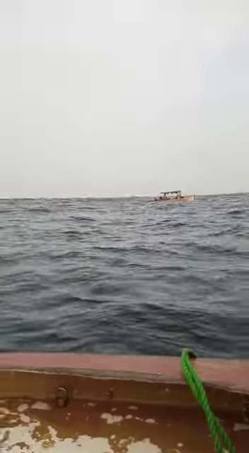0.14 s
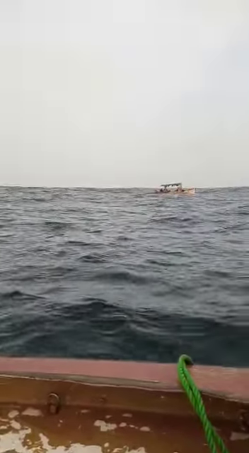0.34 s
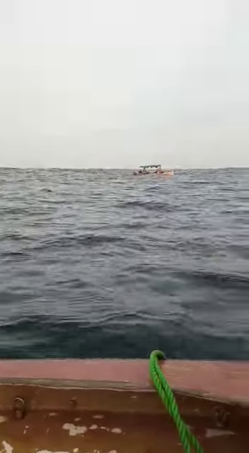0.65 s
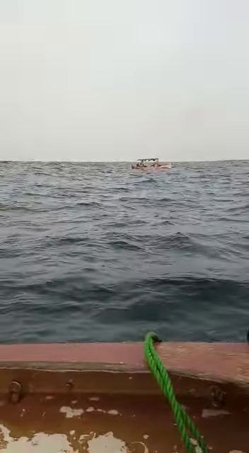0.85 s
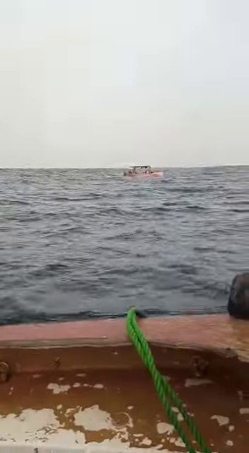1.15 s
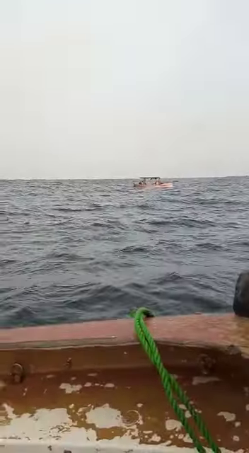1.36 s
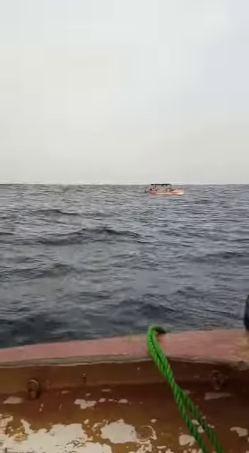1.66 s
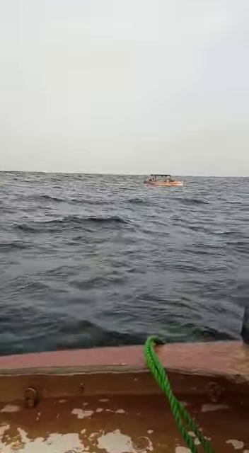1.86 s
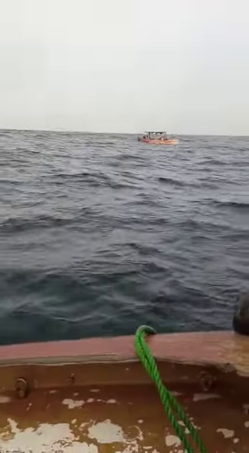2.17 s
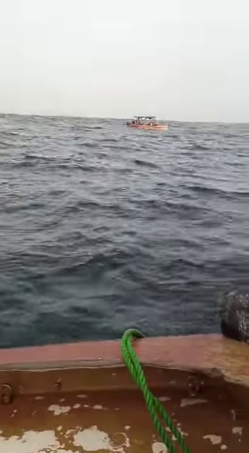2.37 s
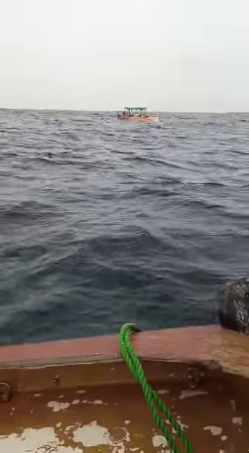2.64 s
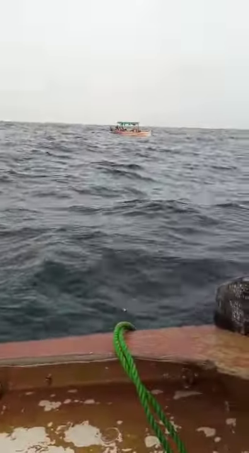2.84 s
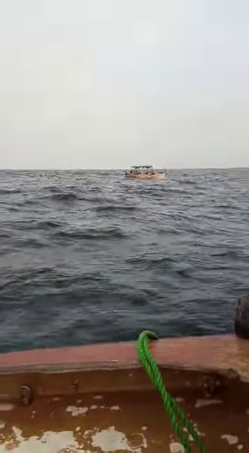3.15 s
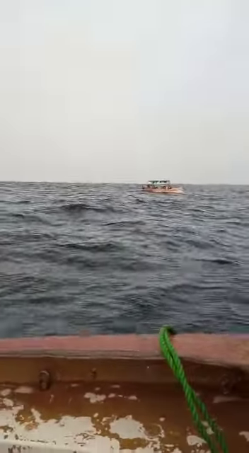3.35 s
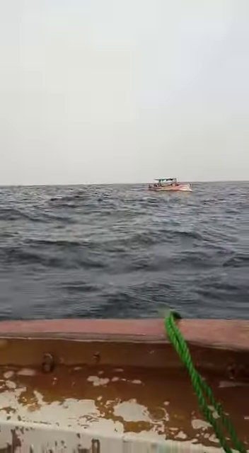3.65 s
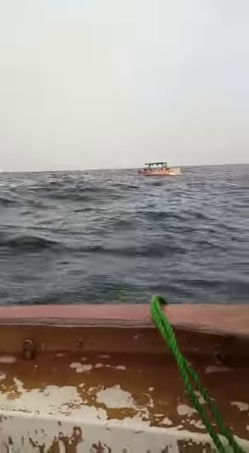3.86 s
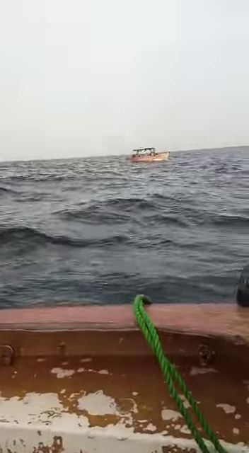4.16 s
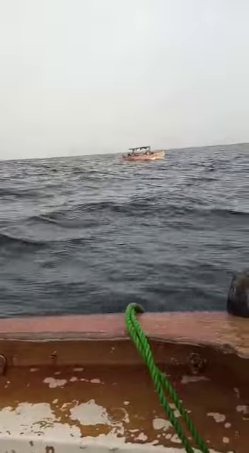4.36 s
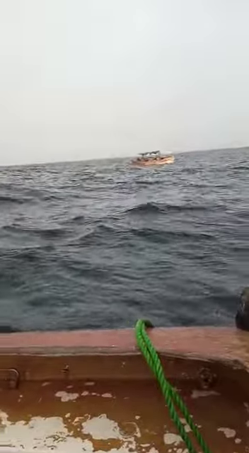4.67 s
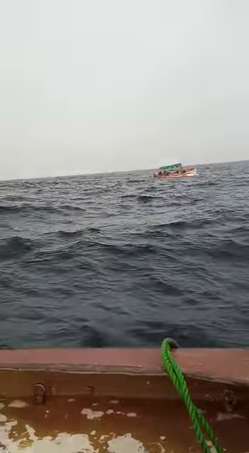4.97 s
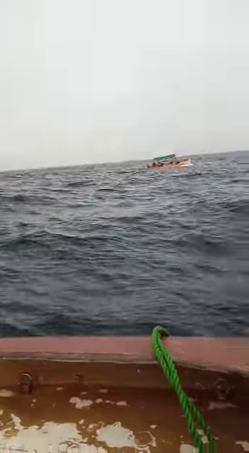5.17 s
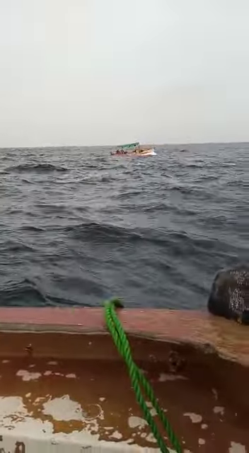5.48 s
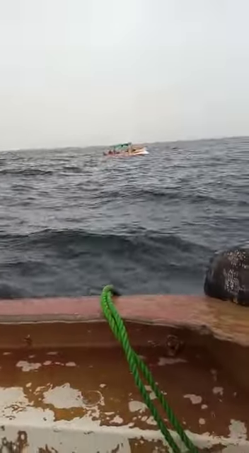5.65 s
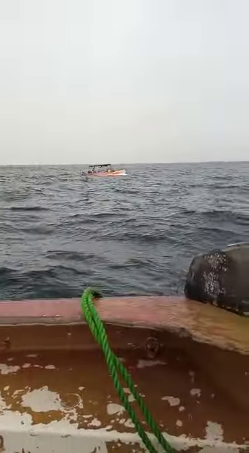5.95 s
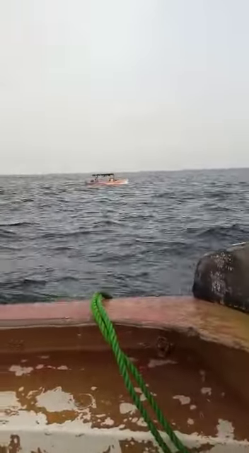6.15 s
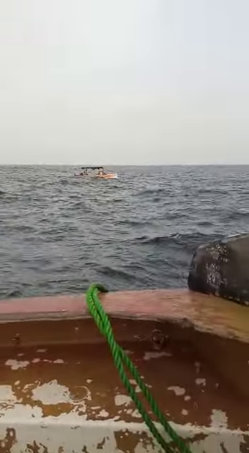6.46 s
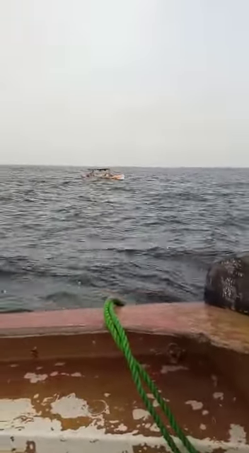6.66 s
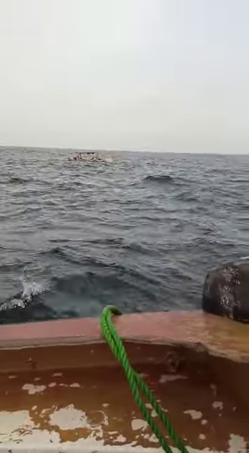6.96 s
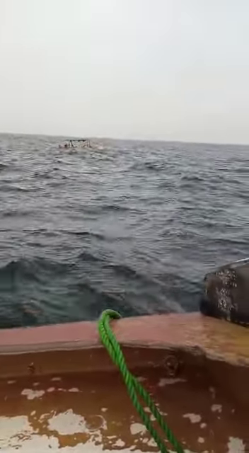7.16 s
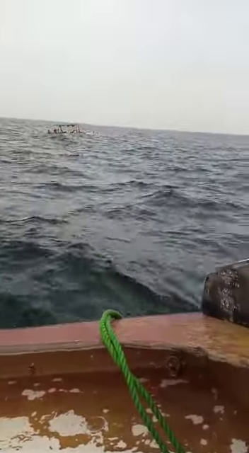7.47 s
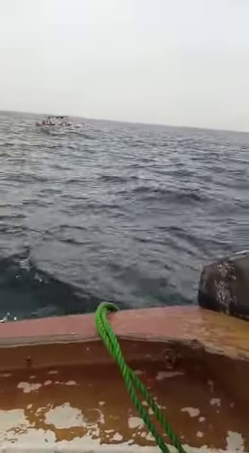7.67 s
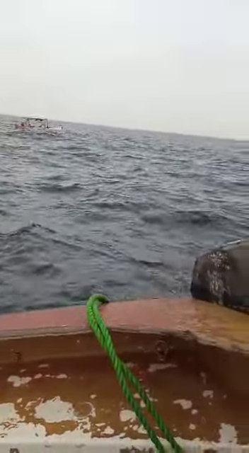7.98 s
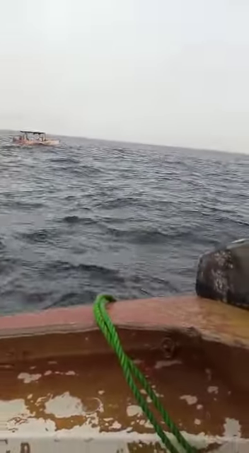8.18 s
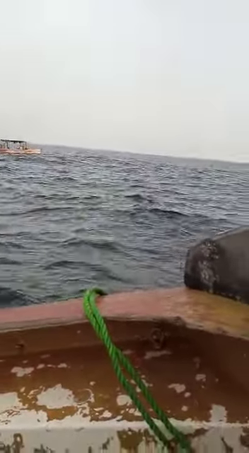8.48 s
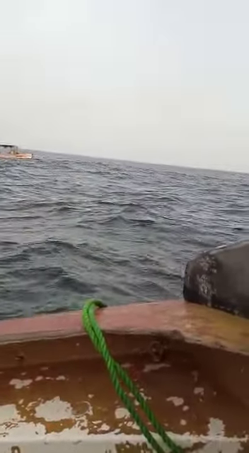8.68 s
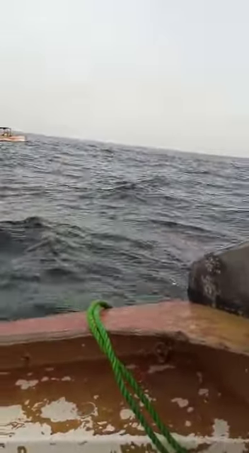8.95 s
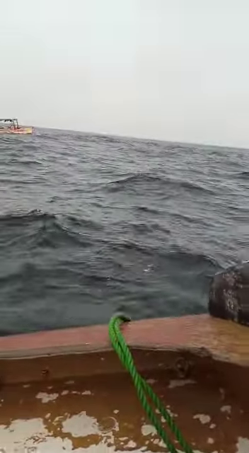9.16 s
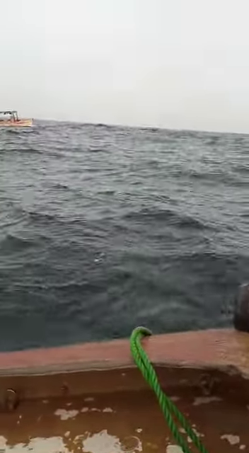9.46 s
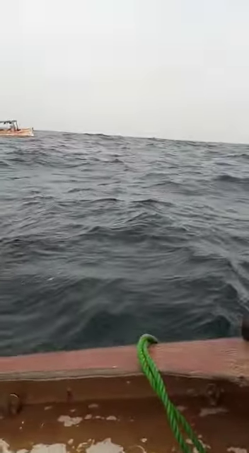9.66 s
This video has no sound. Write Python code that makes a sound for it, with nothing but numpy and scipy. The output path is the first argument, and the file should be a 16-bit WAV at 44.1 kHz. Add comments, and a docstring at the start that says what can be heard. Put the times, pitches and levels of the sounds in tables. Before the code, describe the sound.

Steady diesel chugging on a wooden boat, with washing water, gusts of wind on the microphone and faint creaking later on.

```python
"""A diesel thuds at a nearly even speed, heard from the deck of a wooden boat on the open sea.
Each cycle its blows ring the exhaust, block and valve gear, gas hisses once and loose panels buzz.
Water washes along the hull, wind buffets the microphone and a small part ticks at its own pace.
Later the wind drops, and something under strain sticks and slips, creaking as the boat rolls."""
import sys
import numpy as np
from scipy import signal
from scipy.fft import rfft, irfft, next_fast_len
from scipy.io import wavfile
from scipy.ndimage import uniform_filter1d, minimum_filter1d

SR = 44100
rng = np.random.default_rng(int(sys.argv[2]) if len(sys.argv) > 2 else 0)


def to_wav(s):
    """Save 16-bit WAV."""
    ch = np.atleast_2d(s).T  # columns
    pcm = np.round(np.clip(ch, -1, 1) * 32767)  # PCM
    wavfile.write(sys.argv[1], SR, pcm.astype(np.int16))


N = 433062
T = np.arange(N) / SR
FFT_SIZE = next_fast_len(N + 8192)
LOG_HZ = np.log(np.fft.rfftfreq(FFT_SIZE, 1 / SR) + 1)
CALM_DB = -37  # the wind once it drops

# How each source rises and falls at the microphone. Each row: time in seconds, relative level in dB.
WASH_LEVEL = [(0, -43.5), (0.7, -42), (2.05, -44.5), (2.5, -41.5), (2.84, -38.5), (3.2, -41.5), (3.72, -46),
              (4.2, -42.5), (4.8, -49), (5.36, -44), (5.69, -39.5), (5.93, -41), (6.05, -42.5),
              (6.37, -44.5), (6.97, -40), (7.0, -38.5), (7.14, -37), (7.17, -41.5), (7.55, -38.5),
              (7.68, -39), (7.9, -41.5), (8.04, -42), (8.07, -41), (9.03, -43), (9.82, -42)]
WIND_LEVEL = [(0, -18), (.15, -29), (.4, -21), (.62, -29.5), (.73, -24), (.85, -25.5), (1.2, -31),
              (1.47, -22), (1.68, -27), (1.82, -21), (1.91, -35), (2.02, -15.5), (2.12, -29), (2.27, -18.5),
              (2.45, -39), (3.1, -23), (3.4, -39), (3.68, -28), (3.82, -19.5), (4.05, -28.5), (4.22, -26.5),
              (4.35, -20), (4.6, -16.5), (4.72, -21), (4.88, -24), (4.94, -17), (5.05, -23.5),
              (5.25, -12.5), (5.45, -18), (5.55, -25.5), (5.7, -20.5), (5.82, -35), (5.92, -14),
              (6.02, -26), (6.2, -24), (6.6, CALM_DB), (9.82, CALM_DB)]
DEEP_WIND_LEVEL = [(0, -31.5), (3.6, -34.5), (4, -37), (4.7, -31), (5.5, -36), (5.9, -43), (6.3, -36),
                   (7, -34), (7.4, -42), (9.82, -39)]
TICK_LEVEL = [(0, -53), (.55, -48), (1.8, -58), (2.5, -53), (2.7, -57), (3.65, -54), (3.9, -62), (4.3, -77),
              (4.9, -45.5), (5.25, -55), (5.55, -47.5), (7, -69), (8.5, -76), (9.3, -55), (9.5, -51.5),
              (9.82, -46)]
PUFF_LEVEL = [(0, -57.5), (3.5, -58), (4.9, -60), (6, -57.5), (9.82, -57.5)]
# Colour of each noise, heard on deck. Each row: frequency in Hz, gain in dB.
WASH_TONE = [(710, -6.5), (1200, 0), (1290, -5), (1470, -6), (1750, -8.5), (2150, -11.5), (2940, -11),
             (3170, -10.5), (4880, -13), (6450, -11), (7920, -23), (9020, -20.5), (13400, -41),
             (15100, -25), (15800, -46)]
WIND_TONE = [(20, -52), (40, -17), (80, 4.5), (150, 3), (300, -3.5), (600, -20), (1200, -53), (2500, -95),
             (7000, -101)]
DEEP_WIND_TONE = [(20, -19), (40, -1), (60, 13.5), (85, 5), (130, -39), (400, -95)]
FLAPPING_TONE = [(200, -15), (450, 3), (800, -6), (1500, -24.5), (3000, -44), (8000, -96)]
WIND_CRACK_TONE = [(300, 6), (900, 26), (2000, 8), (4000, -4.5), (8000, -23), (10000, -40)]
TICKING_TONE = [(1500, 7), (2800, 3), (3700, 16), (4600, 14), (6000, 15), (7500, 4), (9000, 9), (12000, -2),
                (13500, -21), (15200, 4)]
GAS_TONE = [(7000, -30), (8500, -1), (10500, -3), (12000, -8), (13400, -11), (14500, 0), (15700, 0)]
ENGINE_BLUR_TONE = [(40, -27), (90, -1), (130, 2), (200, -9.5), (250, -16.5), (285, -2.5), (350, -12),
                    (440, -7.5), (492, -7), (540, -10.5), (620, -16.5), (900, -20), (1300, -22),
                    (1600, -31), (2200, -31.5), (3500, -45), (7000, -97)]
# Buffets right on the microphone. Each row: start in seconds, strength in dB, treble against bass in dB.
BUFFETS = [(.725, -33, -32), (0.891, -33, -28), (1.846, -19, -36), (2.022, -37, -30), (2.25, -30, -35),
           (2.289, -33, -33), (3.817, -22.5, -32), (4.487, -20.5, -21), (4.589, -22, -19),
           (4.619, -23.5, -17), (4.69, -24, -20), (4.756, -24, -14), (4.812, -17, -6), (4.951, -24, -27),
           (4.975, -14, -16.5), (5.024, -25.5, -7), (5.15, -19.5, -28), (5.229, -24, -31),
           (5.269, -12, -11), (5.355, -21, -8), (5.426, -19.5, -11), (5.526, -22.5, -28),
           (5.772, -18.5, -26), (5.942, -28.5, -37)]
# Cracks on the hardest buffets, clinks under the tick and lone snaps in the creak.
# Each row: start in seconds, strength in dB.
WIND_CRACKS = [(4.507, -33), (4.7577, -25), (4.7634, -30), (4.8155, -20), (4.824, -32), (4.981, -22.5),
               (5.024, -28), (5.2675, -28), (5.273, -20), (5.43, -28)]
TICK_CLINKS = [(0.3641, -44), (1.703, -38), (2.4882, -45), (2.6424, -34), (2.7197, -35), (2.799, -36),
               (2.8784, -35), (2.9552, -41), (3.035, -36), (3.1128, -35), (3.188, -33.5), (3.3473, -34),
               (3.4236, -37), (3.5024, -35.5), (3.6586, -35), (3.739, -36.5)]
LONE_SLIPS = [(6.9307, -38), (7.4171, -43), (7.4859, -46), (7.5278, -46), (7.9084, -39), (8.0395, -41)]
# Runs of creaking. Each row: start and length in seconds, strength in dB, first and last slips a second.
CREAK_RUNS = [(6.28, 0.19, -47, 22, 14), (6.546, 0.23, -43.5, 30, 140), (6.868, 0.28, -44, 60, 140),
              (7.181, 0.24, -43.5, 74, 110), (7.399, 0.14, -46, 70, 51), (7.572, .1, -42.5, 150, 160),
              (7.689, 0.26, -42, 156, 170), (7.955, 0.092, -42.5, 130, 69)]
# Resonances stirred by noise. Each row: frequency in Hz, width in Hz, gain in dB.
CLINK_BANDS = [(3260, 830, 15.3), (3940, 57, 20), (5330, 260, 6.6)]
CREAK_BANDS = [(4730, 130, 7.5), (5900, 760, 7), (6670, 630, 7.5), (8860, 650, 5.5), (10400, 300, -3),
               (11700, 840, -1), (13100, 700, -6), (14700, 600, 5), (15400, 500, 4)]
PANEL_A_BANDS = [(1857, 70, 1.5), (2727, 75, -1.5), (3304, 110, -3.5), (4070, 93, -3.5)]
PANEL_B_BANDS = [(1750, 67, 3.5), (2400, 70, -0.5), (2530, 55, 1), (3140, 36, 1.5), (3780, 47, -5.5),
                 (4290, 46, -2.5)]
COVER_HUM_BANDS = [(878, 6, -27)]
# How well the panels carry to the microphone. Each row: time in seconds, gains of A and B in dB.
PANEL_LEVELS = [(0, -31, -40), (.6, -41.5, -39.5), (2, -36, -44), (2.8, -33.5, -39.5), (3.8, -37, -41),
                (5, -38, -46), (6.5, -41, -40.5), (8, -42, -40), (9, -42, -33.5), (9.82, -44, -39)]
# Crankshaft speed. Each row: time in seconds, turns a minute.
CRANK_RPM = [(0, 1193.0), (0.8, 1171.5), (1.3, 1187.2), (2.8, 1179.4), (3.7, 1153.9), (4.4, 1154.7),
             (6, 1180.2), (7.4, 1187.9), (8.6, 1178.8), (9.4, 1160.8), (9.9, 1158.6)]
# Struck parts of the engine, a dull knock near 255 Hz and a short ringing knock near 520 Hz.
# Each row: frequency in Hz, time to fall 60 dB in seconds, gain in dB, signed weight.
EXHAUST_MODES = [(61.7, 0.31, -43.5, -1), (101.4, 0.2503, -19.4, 1), (114.5, 0.31, -27.2, 1),
                 (175.8, 0.31, -10.0, -1), (208.2, 0.31, -20.3, 1), (240.6, 0.31, -21.0, -1)]
BLOCK_MODES = [(324, .3, -18.3, -1), (351.4, .276, 0, 1), (387.4, .0753, 10.8, 1), (425.9, .0283, 19.1, -1),
               (469.6, .118, 4.3, 1), (545, .12, 1, 1), (660, .0333, 7.5, -1)]
HEAD_MODES = [(721, 0.05, -13.5, -0.76), (947, 0.013, 4.5, 0.46), (992, 0.038, 12.5, -0.15),
              (1219.4, 0.011, 17, -0.8), (1269, 0.0088, 18.5, 0.83), (1421, 0.011, 9.5, -0.53),
              (1696, 0.032, -0.5, -0.23), (2044, 0.012, 4, 0.36)]
TAPPET_MODES = [(1276, 0.051, 13.2, 0.59), (1080, 0.031, 1.9, -0.5)]
COVER_MODES = [(879.5, 0.047, -29.5, 0.71), (1088, 0.042, -34, 0.69), (2030, 0.016, -35, 0.84)]
LOW_KNOCK_MODES = [(255, .03, 0, 1)]
MID_KNOCK_MODES = [(520, .05, 0, 1)]
# Blows that ring those modes in one cycle.
# Each row: crank angle in degrees, strength in dB, brightness in dB per octave.
EXHAUST_BLOWS = [(-23.7, -1.2, -5.6), (111.1, -5.2, 8.9), (208.1, -4.3, -9.1), (352.3, -14.1, 6.0),
                 (443.5, -0.5, -9.5), (574.5, -8.5, 0.5)]
BLOCK_BLOWS = [(-51.1, .3, 17.5), (131.4, 5.8, -10), (242.8, 0, -18), (285.4, 5.3, 8), (452.3, -13, 18),
               (511.2, -5, 18), (659.6, 0, -15.7)]
HEAD_BLOWS = [(-39.5, 11, 3), (210, 5, -20), (315, 4, -19), (422, 6, -3), (575, -19, 1)]
TAPPET_BLOWS = [(177.6, 9.6, 0.0045), (400, 0.5, 0)]
COVER_BLOWS = [(-37, 9, 1), (312.5, 1.5, -8), (421.5, -6, 3)]
LOW_KNOCK_BLOWS = [(-32, -8.2, 0), (35, -13.3, 0), (161, -17, 0), (357, -12.5, 0), (514, -15.5, 0)]
MID_KNOCK_BLOWS = [(-58, -5, 0), (85, -9.2, 0), (251, -5.7, 0), (342, -8.1, 0), (447, -5.2, 0)]
# How much of the engine top reaches the microphone as it turns about.
# Each row: time in seconds, then gains in dB for head, tappet, the head's ring near 900 Hz and cover.
ENGINE_TOP_LEVELS = [(0, 11.5, -2, -11, 16), (.5, 6, 1, -5, 13.5), (1.1, 7, -4.5, 5.5, 12.5),
                     (2, 6, -1, -2, 12), (2.6, 6, 0, -3, 6), (3.1, 7.5, 3, -3, 6), (3.5, 10, 4, -6, 15),
                     (3.9, 8.5, -5, 0.5, 14.5), (5, 3.5, -7, 1, 11), (6, 6, -4, 7, 10),
                     (7, 5, -5.5, 8.5, 9.5), (8.2, 5.5, -1.5, 7, 6), (9, 9.5, 0, -2, -1),
                     (9.9, 7, -1, -3, 15)]


def amp(db):
    """Decibels to gain."""
    return 10 ** (np.asarray(db) / 20)


def unit_rms(x):
    """Scales to rms 1."""
    return x / np.sqrt(np.mean(x ** 2) + 1e-20)


def noise():
    """Fresh white noise."""
    return rng.standard_normal(N)


def curve(rows, column=1):
    """One column of a timed table, at every sample."""
    table = np.transpose(rows)
    return np.interp(T, table[0], table[column])


def coloured(x, points):
    """Filters by a spectrum of (Hz, dB) points."""
    hz, db = np.transpose(points)
    return irfft(rfft(x, FFT_SIZE) * amp(np.interp(LOG_HZ, np.log(hz), db)), FFT_SIZE)[:N]


def ringing(x, bands):
    """Passes a sound through a set of resonances."""
    return sum(amp(db) * signal.lfilter(*signal.iirpeak(hz, hz / width, SR), x)
               for hz, width, db in bands)


def wander(seconds):
    """A smooth random signal of rms 1 that changes over the given time."""
    size = max(round(seconds * SR), 2)
    return unit_rms(uniform_filter1d(uniform_filter1d(noise(), size), size))


def clicks(seconds, gains):
    """One-sample clicks at the given times and gains."""
    at = np.round(seconds * SR).astype(int)
    inside = (at >= 0) & (at < N)
    return np.bincount(at[inside], gains[inside], N)


def bursts(triggers, t60):
    """Each click lets out noise that swells briefly, then falls 60 dB in t60 seconds."""
    fall, rise = amp(-60 / (t60 * SR)), amp(-60 * 7.8 / (t60 * SR))
    decay = signal.lfilter([1], [1, -fall], triggers)
    return signal.lfilter([1 - rise], [1, -rise], decay) * noise()


def cycles(start_deg=-109.4):
    """Four-stroke cycles run through, at every sample; each is two turns, or 720 degrees."""
    return start_deg / 720 + np.cumsum(curve(CRANK_RPM)) / 120 / SR


def wash(full_fizz_db=-41.5):
    """Water along the hull: hiss in drifting patches and fine drops, pressed by the engine cycle."""
    real, imag, patches = rng.standard_normal((N // 128 + 5, 257, 3)).T
    patches = unit_rms(uniform_filter1d(uniform_filter1d(patches, 6, axis=0), 12, axis=1))
    hiss = signal.istft((real + 1j * imag) * amp(1.55 * patches), nperseg=512, noverlap=384)[1][:N]
    drops = (rng.random(N) < 300 / SR) * amp(2.4 * np.minimum(rng.exponential(1, N), 4))
    throb = amp(0.98 * np.cos(2 * np.pi * (cycles() - .4)) + 1.66 * wander(0.012))
    water = throb * unit_rms(hiss) + 0.24 * unit_rms(bursts(drops, t60=0.0065))
    water = unit_rms(coloured(water, WASH_TONE))
    fizz = coloured(water, [(6500, -60), (8500, 0)])
    level_db = curve(WASH_LEVEL)
    # the fizz on top fades faster and flickers more than the body
    fizz_gain = amp(np.minimum(3.5 * (level_db - full_fizz_db), 0) + 3.6 * wander(0.026))
    return amp(level_db) * (water + (fizz_gain - 1) * fizz)


def wind():
    """Turbulence on the microphone: a lumpy rumble, with buffets, cracks and flapping in the gusts."""
    wind_db = curve(WIND_LEVEL)
    lumps = amp(3 * wander(0.012) + 1.5 * wander(0.033))
    rumble = amp(wind_db) * unit_rms(coloured(lumps * noise(), WIND_TONE))
    deep = amp(curve(DEEP_WIND_LEVEL)) * unit_rms(coloured(noise(), DEEP_WIND_TONE))
    starts, db, treble_db = np.transpose(BUFFETS)
    bass = coloured(bursts(clicks(starts, amp(db)), t60=0.069),
                    [(60, 19), (150, 31), (400, 22.5), (700, 18), (1200, 1.5), (2500, -75), (7000, -71)])
    treble = coloured(bursts(clicks(starts, amp(db + treble_db)), t60=0.085),
                      [(500, 10), (1200, 18.5), (2500, 0), (4500, -14), (9000, -44)])
    starts, db = np.transpose(WIND_CRACKS)
    cracks = coloured(bursts(clicks(starts, amp(db)), t60=0.0092), WIND_CRACK_TONE)
    flapping = unit_rms(coloured(amp(4.5 * wander(.008)) * noise(), FLAPPING_TONE))
    flapping_db = -34 + 1.3 * (wind_db + 17.5)  # grows faster than the rumble
    return rumble + amp(flapping_db) * flapping + deep + bass + treble + cracks


def tick(first_s=.048, per_second=12.756):
    """A small part ticks at its own even pace, swelling and fading, at times with a clink under it."""
    starts = np.arange(first_s, N / SR, 1 / per_second)
    taps = clicks(starts, amp(2.4 * rng.standard_normal(len(starts))))
    clink_starts, db = np.transpose(TICK_CLINKS)
    clink = ringing(bursts(clicks(clink_starts, amp(db - 4)), t60=.045), CLINK_BANDS)
    body = coloured(bursts(taps, t60=.07), [(6500, 1), (8000, -2)])
    edge = amp(6) * coloured(bursts(taps, t60=0.016), [(6000, -23), (8000, -1)])
    return coloured(amp(curve(TICK_LEVEL)) * (body + edge), TICKING_TONE) + clink


def creak():
    """Stick and slip under strain: runs of slips that change pace, uneven when fast, and lone snaps."""
    slips, uneven, force = np.zeros(N), wander(0.012), amp(0.64 * noise())
    for start, length, db, first_pace, last_pace in CREAK_RUNS:
        pace = first_pace + (last_pace - first_pace) * (T - start) / length
        sliding = (T >= start) & (T < start + length)
        slip_count = np.ceil(np.cumsum(sliding * pace * (1 + 0.31 * uneven * pace / 100)) / SR)
        slips += amp(db) * (np.diff(slip_count, prepend=0) > 0)
    starts, db = np.transpose(LONE_SLIPS)
    snaps = bursts(clicks(starts, amp(db)), t60=0.026)
    runs = bursts(slips * force * amp(0.76 * wander(0.053)), t60=.024)
    return ringing(snaps + runs, CREAK_BANDS)


def gas_puffs(peak_deg=170, rise_deg=70, fall_db=12):
    """Gas hisses once a cycle, swelling quickly and sinking until the next puff."""
    since_peak = (cycles() - peak_deg / 720) % 1
    rise = np.clip((since_peak - 1) * 720 / rise_deg + 1, 0, 1)
    shape_db = -fall_db * np.sqrt(since_peak) * (1 - rise) + 3.2 * wander(.012)
    return amp(curve(PUFF_LEVEL) + shape_db) * unit_rms(coloured(noise(), GAS_TONE))


def panels():
    """Two loose metal panels buzz as the engine shakes them in rough fits, three to a cycle."""
    fits = amp(2.2 * wander(0.0088) + 2.4 * np.cos(2 * np.pi * 3 * (cycles() + 0.037)))
    shake = fits * coloured(noise(), [(5000, 0), (9000, -30)])
    return (amp(curve(PANEL_LEVELS)) * ringing(shake, PANEL_A_BANDS)
            + amp(curve(PANEL_LEVELS, column=2)) * ringing(shake, PANEL_B_BANDS))


def struck(modes, blows, band_hz, soft_s, jitter_s, jitter_db):
    """Every cycle the same blows, a little uneven in time and force, ring one set of modes."""
    low, mid, high = band_hz
    size, phase = next_fast_len(N + SR), cycles()
    bins = slice(1, size // 16)
    hz = np.fft.rfftfreq(size, 1 / SR)[bins]
    s = 2j * np.pi * hz
    cycle_numbers, drive = np.arange(int(phase[-1]) + 2), 0
    for deg, db, tilt_db in blows:
        late, force = rng.standard_normal((len(cycle_numbers), 2)).T
        starts = np.interp(cycle_numbers + deg / 720, phase, T, -1, -1) + jitter_s * late
        brightness = amp(tilt_db * np.log2(np.clip(hz, low, high) / mid))
        drive += brightness * rfft(clicks(starts, amp(db + jitter_db * force)), size)[bins]
    ring = sum(weight * amp(db) * 2 * np.pi * f / ((s + np.log(1000) / t60) ** 2 + (2 * np.pi * f) ** 2)
               for f, t60, db, weight in modes)
    band = 1 / np.sqrt((1 + (low / hz) ** 16) * (1 + (hz / high) ** 16))
    softness = 1 / (1 + s * soft_s) ** 2  # soft blows lose their edge
    return SR * irfft(np.r_[0, drive * ring * band * softness], size)[:N]


def diesel():
    """Exhaust thuds, knocks and valve clatter ring out each cycle over a throbbing blur."""
    exhaust = struck(EXHAUST_MODES, EXHAUST_BLOWS, (64, 150, 300),
                     soft_s=.00094, jitter_s=.00012, jitter_db=.8)
    block = struck(BLOCK_MODES, BLOCK_BLOWS, (285, 420, 650), .00294, .00004, .6)
    head = struck(HEAD_MODES, HEAD_BLOWS, (650, 1000, 2650), .0019, .00008, 1.5)
    tappet = struck(TAPPET_MODES, TAPPET_BLOWS, (900, 1275, 1700), .0019, .0001, 2.2)
    cover = struck(COVER_MODES, COVER_BLOWS, (650, 1000, 2650), .00034, .00006, .9)
    low_knock = struck(LOW_KNOCK_MODES, LOW_KNOCK_BLOWS, (225, 270, 325), .001, .0001, 1)
    mid_knock = struck(MID_KNOCK_MODES, MID_KNOCK_BLOWS, (472, 550, 640), .001, .0001, 2)
    throb = amp(0.73 * np.cos(2 * np.pi * 3 * (cycles() - .05)) + 1.55 * wander(0.015))
    blur = amp(-32) * unit_rms(coloured(throb * noise(), ENGINE_BLUR_TONE))
    cover += ringing(noise(), COVER_HUM_BANDS)  # keeps humming between blows
    head_gain, tappet_gain, ring_gain, cover_gain = (
        amp(curve(ENGINE_TOP_LEVELS, column)) for column in (1, 2, 3, 4))
    head += (ring_gain - 1) * coloured(head, [(780, -30), (860, 0), (1000, 0), (1120, -40)])
    top = head_gain * head + tappet_gain * tappet + cover_gain * cover
    return blur + amp(1.55) * exhaust + block + low_knock + mid_knock + top


def scene():
    """Boat, sea and wind at one microphone on deck."""
    return (diesel() + gas_puffs() + panels() + wind() + wash() + tick() + creak())[None]


def record(dry, threshold_db=-6.4, release_db_per_s=60, cutoff_hz=15830):
    """A quick limiter ducks under loud buffets, the highest peaks round off and the top treble is cut."""
    peak_db = 20 * np.log10(-minimum_filter1d(-abs(dry[0]), 200) + 1e-9)
    release = T * release_db_per_s
    held_db = np.maximum.accumulate(peak_db + release) - release
    over_db = np.maximum(held_db - threshold_db, 0)
    ducked = dry / amp(0.5 * uniform_filter1d(over_db, 200))
    rounded = .75 * np.tanh(ducked / .75)
    lowpass = signal.firwin(511, cutoff_hz, window=("kaiser", 9), fs=SR)
    return signal.oaconvolve(rounded, lowpass[None], "same")


dry = scene()
out = record(dry)
to_wav(out)
```